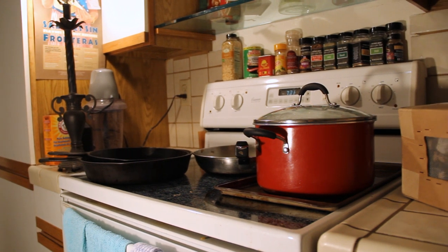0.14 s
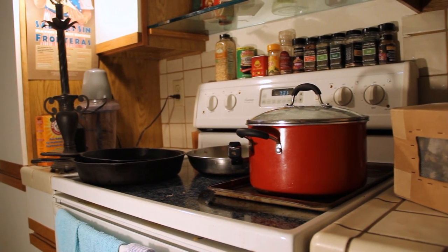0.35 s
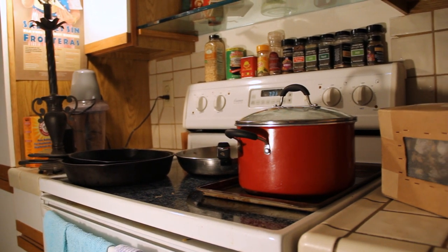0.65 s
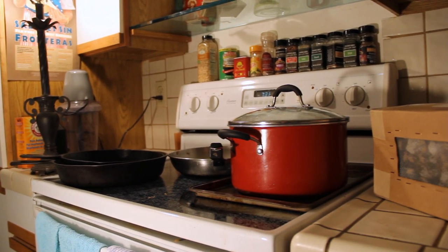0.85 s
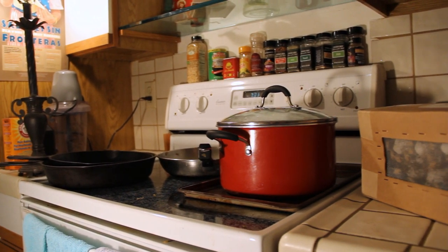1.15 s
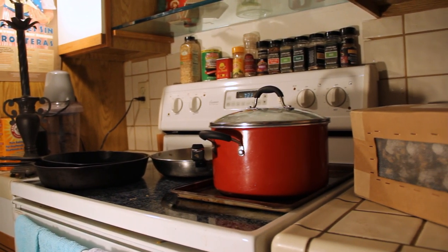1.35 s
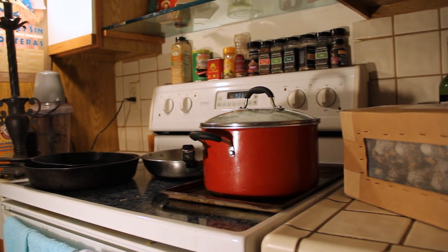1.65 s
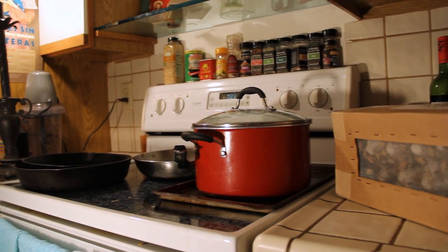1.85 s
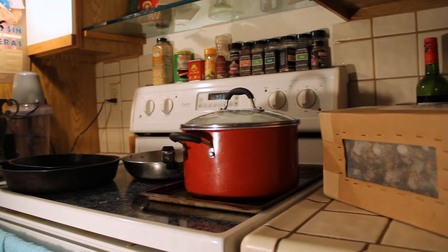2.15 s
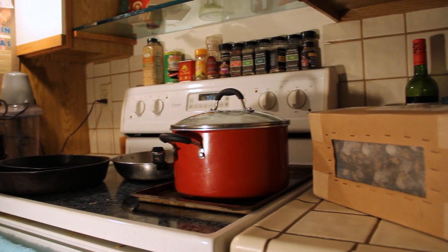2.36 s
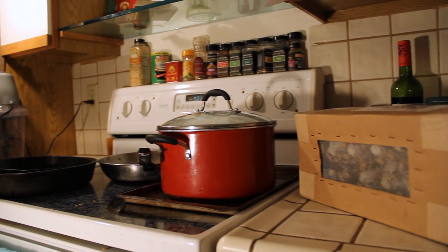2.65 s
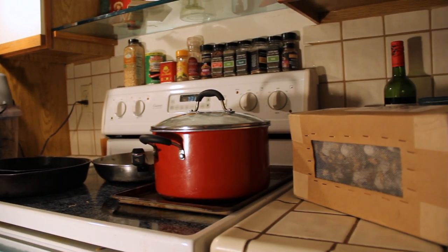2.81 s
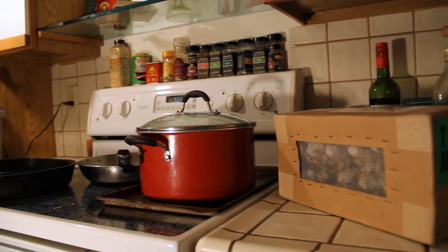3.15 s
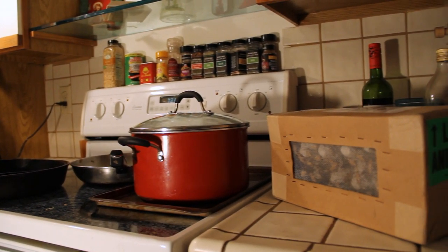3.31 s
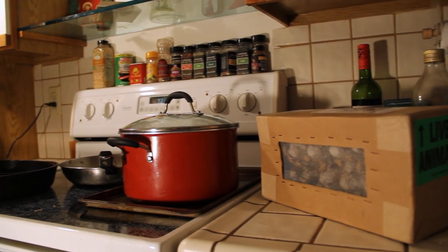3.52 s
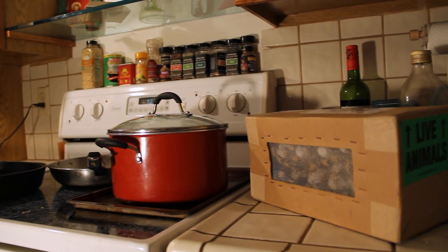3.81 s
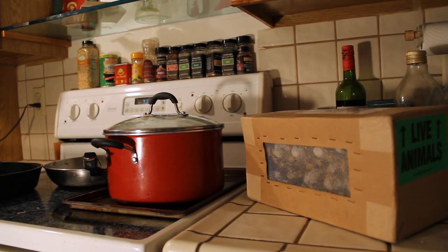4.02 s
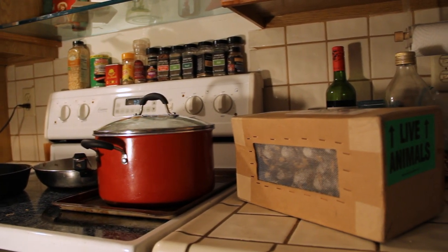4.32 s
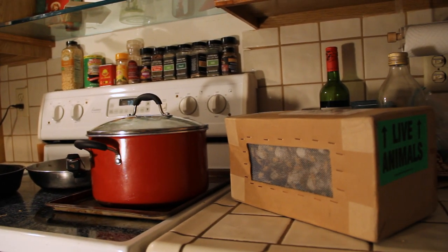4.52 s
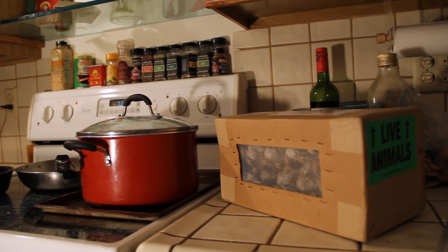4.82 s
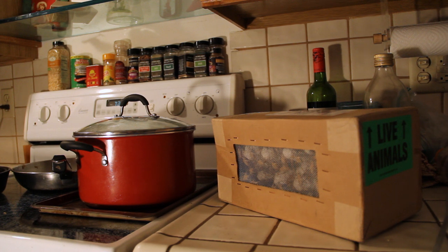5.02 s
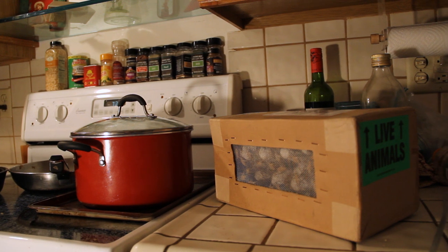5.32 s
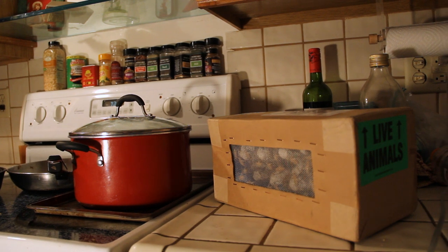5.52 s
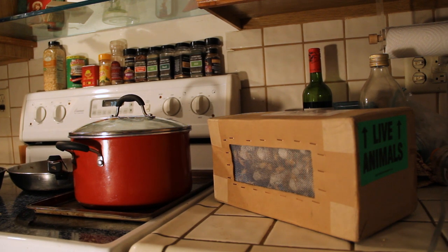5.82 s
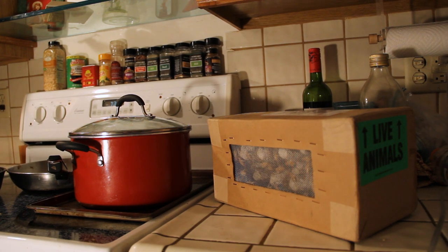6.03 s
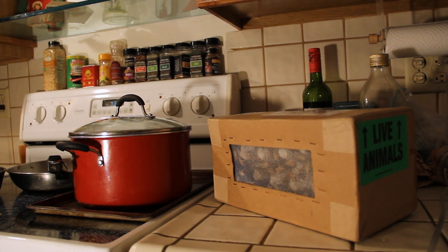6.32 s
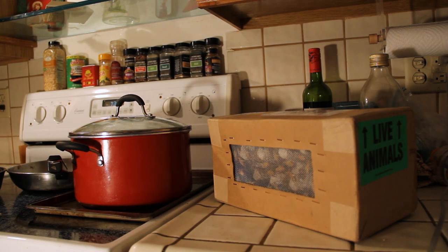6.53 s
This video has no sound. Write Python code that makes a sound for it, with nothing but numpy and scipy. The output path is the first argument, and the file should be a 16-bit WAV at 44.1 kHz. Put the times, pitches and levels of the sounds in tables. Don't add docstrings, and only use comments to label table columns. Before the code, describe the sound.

A cricket in a cardboard box sings fast, steady, high three-stroke chirps close by, while a weaker neighbour rasps behind over a faint refrigerator hum.

```python
import sys
import numpy as np
from scipy import signal
from scipy.fft import rfft, irfft, next_fast_len
from scipy.io import wavfile
from scipy.ndimage import uniform_filter1d

SR = 44100
rng = np.random.default_rng(int(sys.argv[2]) if len(sys.argv) > 2 else 0)


def wav_record(signal):
    frames = np.transpose(np.atleast_2d(signal))
    bounded = np.clip(frames, -1, 1)
    quanta = np.round(bounded * 32767).astype(np.int16)
    wavfile.write(sys.argv[1], SR, quanta)


def boost_factor(decibels):
    exponent = np.asarray(decibels, float) / 20
    return 10 ** exponent


N = 293629

SINGER_PACE = [0.0236, 0.3317, 0.7712, 1.3384, 1.4790, 1.7639, 1.9074, 2.0578, 2.2001, 2.4936, 2.8003,
               3.5534, 3.8459, 3.9900, 4.5860, 5.3312, 5.4745, 5.9102, 6.3507, 6.6380]
# (frequency [Hz], level [dB])
TOOTH_COLOUR = [(4300, -10), (5000, -4), (6200, 3), (7200, 6.5), (7800, -4), (8250, -4), (8750, -6.5),
                (9500, -12), (10400, -4.5), (11300, -8.5), (12500, -10.5), (14000, -7.5), (16000, -13.5)]


def colour(x, points):
    hz, db = np.transpose(points)
    size = next_fast_len(len(x))
    axis = np.log(np.arange(size // 2 + 1) * SR / size + 1)
    gain = boost_factor(np.interp(axis, np.log(hz), db, left=-90))
    return irfft(rfft(x, size) * gain, size)[:len(x)]


def level(x, db):
    return x * boost_factor(db) / np.sqrt(np.mean(x ** 2))


def add(track, x, s):
    i = max(int(s * SR), 0)
    track[i:i + len(x)] += x[:max(N - i, 0)]


def resonance(x, hz, width_hz):
    return signal.lfilter(*signal.iirpeak(hz, hz / width_hz, fs=SR), x)


def tail(t60, start_s):
    t = np.arange(int(.3 * SR)) / SR
    decay = np.exp(-np.log(1000) * t / t60)
    x = rng.standard_normal(len(t)) * decay * np.clip(t / start_s, 0, 1) ** 2
    return x / np.sqrt(np.sum(x ** 2))


def whine(curve):
    s, hz, db = np.transpose(curve)
    t = np.arange(N) / SR
    fade = np.clip(np.minimum(t - s[0] + .01, s[-1] - t) / .03, 0, 1)
    phase = 2 * np.pi * np.cumsum(np.interp(t, s, hz)) / SR
    return np.sqrt(2) * fade * boost_factor(np.interp(t, s, db)) * np.sin(phase)


def rumble_and_hiss():
    # (frequency [Hz], level [dB])
    low_floor = [(20, -0.5), (40, -12), (52, -4), (85, 1), (130, -5.5), (155, -13.5), (300, -12.5),
                 (420, -10.5), (650, -14.5), (1000, -17.5), (1800, -24.5), (4200, -28)]
    # (frequency [Hz], level [dB])
    hiss_colour = [(3000, -34), (4200, 8.5), (8000, 8.5), (16000, 2.5)]
    rumble = level(colour(rng.standard_normal(N), low_floor + [(4600, -91)]), -63.5)
    return rumble + level(colour(rng.standard_normal(N), hiss_colour), -71)


def refrigerator():
    # (frequency [Hz], width [Hz], rms level [dB])
    panels = [(79.6, 2.5, -82), (93, 7.5, -70), (120, 12, -72.5), (243, 16, -75.5), (419, 23, -76.5),
              (557, 7.2, -84.5), (598, 4.8, -82), (753, 4.6, -82.5)]
    # (frequency [Hz], rms level [dB])
    motor = [(59.2, -71.5), (118.4, -69), (236.8, -77), (249.5, -70), (295.5, -77.5), (354.5, -84),
             (472.5, -75.5), (500.6, -80.5), (531, -81.5)]
    out = np.zeros(N)
    for hz, width_hz, db in panels:
        out += level(resonance(rng.standard_normal(N), hz, width_hz), db)
    for hz, db in motor:
        beat_db = uniform_filter1d(rng.standard_normal(N // 4096 + 1).repeat(4096), 4096)[:N]
        tone = np.sin(2 * np.pi * (hz * np.arange(N) / SR + rng.random()))
        out += level(boost_factor(2.4 * beat_db) * tone, db)
    return out


def passing_whines():
    # (time [s], pitch [Hz], rms level [dB])
    thin = [
        (0.0, 570, -72),
        (0.30, 611, -70),
        (0.35, 624, -90),
    ]
    # (time [s], pitch [Hz], rms level [dB])
    engine = [
        (1.2, 117, -84),
        (1.5, 122, -70),
        (2.15, 139, -71),
        (2.5, 148, -88),
        (2.9, 160, -67),
        (3.7, 181.3, -77),
        (4.0, 180, -83),
    ]
    # (time [s], pitch [Hz], rms level [dB])
    moan = [
        (0, 187.4, -67),
        (.15, 189.3, -72),
        (.27, 208, -68),
    ]
    return whine(thin) + whine(engine) + whine(moan)


def clock():
    tick_s, rebound_s = .548, .045
    steps = np.zeros(N)
    steps[int(tick_s * SR)::SR] = 1
    steps[int((tick_s + rebound_s) * SR)::SR] = 0.91
    ring = colour(tail(0.45, 0.0019), [(400, -26), (800, 11.5), (1500, -2.5), (2500, 0.5), (4500, -1), (8000, -33)])
    return boost_factor(-34) * signal.fftconvolve(steps, ring)[:N]


def chirp_times(pace):
    period_s = .147
    number = np.cumsum(np.round(np.diff(pace, prepend=pace[0]) / period_s))
    return np.interp(np.arange(number[-1] + 1), number, pace)


def stroke(t, hz0, hz1, ms, swell, fade, glide):
    u = np.clip(t * 1000 / ms, 0, 1)
    top = swell / (swell + fade)
    envelope = (u / top) ** swell * ((1 - u) / (1 - top)) ** fade
    cycles = ms / 1000 * (hz0 * u + (hz1 - hz0) * u ** (glide + 1) / (glide + 1))
    return envelope, 2 * np.pi * cycles


def rasps():
    # (time [s], force [dB], which has no effect below)
    neighbour_pace = [(0.122, 0), (0.862, -3), (1.008, -1), (1.308, -1), (1.492, -6), (1.616, -3),
                      (1.765, 0), (1.903, -5), (2.313, 2), (2.762, -1), (2.949, 1), (3.084, 1),
                      (3.242, 3.5), (3.399, 0), (3.573, -11), (3.697, 8), (3.844, -6), (3.981, -12),
                      (4.097, 0), (4.23, -2), (4.516, 0), (4.669, 2), (5.096, 0), (5.218, -6), (5.372, -1),
                      (5.660, 1), (5.824, -1), (6.27, -5), (6.567, 2)]
    # (time from last stroke [ms], rasp level [dB], tone level [dB])
    neighbour_strokes = [
        (-37, -74.5, -62),
        (-24, -56.5, -52),
        (1.5, -54.5, -51),
    ]
    # (time from first stroke [ms], rasp level [dB], tone level [dB])
    singer_rasps = [
        (1.53, -61, -48),
        (17.05, -65, -65),
        (38.44, -62.5, -55),
    ]
    # (time [s], rasp level [dB], tone level [dB])
    accents = [(1.428, -62, -53), (0.665, -59, -50), (0.951, -56, -50), (3.822, -65, -48),
               (1.236, -52.5, -50), (1.307, -64, -42), (1.519, -60, -55), (1.765, -66, -34.5),
               (2.312, -58, -38), (2.46, -58, -40.5), (2.762, -72, -40.5), (2.927, -62, -53),
               (3.4, -67, -48), (3.549, -64, -50), (3.955, -66, -32), (4.097, -65, -44),
               (4.230, -68, -41.5), (4.329, -54, -55), (4.376, -65, -41), (1.468, -70, -48),
               (4.775, -53.5, -52), (4.811, -65, -43.5), (4.921, -62, -54), (5.092, -66, -52),
               (5.372, -82, -41), (5.494, -69, -59), (5.514, -56, -50), (5.972, -63, -52),
               (6.103, -56.5, -41), (6.243, -72, -32.5)]
    pace, force_db = np.transpose(neighbour_pace)
    rows = []
    for s in chirp_times(pace):
        for ms, rasp_db, tone_db in neighbour_strokes:
            force = (ms == 0) * np.interp(s, pace, force_db)
            rows.append((s + ms / 1000, rasp_db + force, tone_db))
    for s in chirp_times(SINGER_PACE):
        for ms, rasp_db, tone_db in singer_rasps:
            rows.append((s + ms / 1000, rasp_db, tone_db))
    scatter = rng.standard_normal((len(rows), 3)) * [0, 1.5, 3]
    return np.vstack([rows + scatter, accents])


def neighbour():
    # (frequency [Hz], level [dB])
    trays = [(4000, -4), (5000, 0.5), (5600, -1), (6500, -2.5), (7600, -2), (8600, 0), (10000, -0.5),
             (16000, 0.5)]
    # (frequency [Hz], width [Hz], level [dB])
    hollows = [(5300, 240, -5), (7930, 130, 2), (8690, 270, -0.5), (9630, 140, 0), (11360, 400, -1)]
    tone_hz, rasp_gain_db, tone_gain_db = 5600, 4, -3
    rasp, tone = np.zeros(N), np.zeros(N)
    t = np.arange(1 << 11) / SR
    burst = np.clip(t / .002, 0, 1) * np.exp(-(t / 0.0094) ** 1.73)
    rows = rasps()
    for (s, noise_db, ring_db), d in zip(rows, rng.standard_normal((len(rows), 2))):
        hz0, hz1 = tone_hz + 60 + 40 * d[0], tone_hz - 90 + 40 * d[1]
        envelope, phase = stroke(t, hz0, hz1, 11.1, 3.2, 1.0, 2.0)
        ring = np.sin(phase) + boost_factor(-31.0) * np.sin(2 * phase)
        add(tone, boost_factor(ring_db + tone_gain_db) * envelope * ring, s)
        add(rasp, boost_factor(noise_db + rasp_gain_db) * burst, s + 0.0006)
    force = boost_factor(4 * np.minimum(rng.exponential(size=N // 48 + 1), 2)).repeat(48)[:N]
    clicks = rng.standard_normal(N) * force
    rasp = rasp * level(colour(colour(clicks, TOOTH_COLOUR), trays), 0)
    rings = sum(boost_factor(db) * resonance(rasp, hz, width_hz) for hz, width_hz, db in hollows)
    dry = tone + boost_factor(-4) * rasp + boost_factor(1.5) * rings
    return dry + boost_factor(-6) * signal.fftconvolve(dry, tail(0.068, 0.0039))[:N]


def singer():
    # (start [Hz], end [Hz], length [ms], swell [power], fade [power], glide [power], peak [dB])
    strokes = [
        (6306, 5700, 6.16, 0.51, 1.9, 0.74, -39),
        (6960, 5848, 11.18, 3, 0.88, 1.396, -29.0),
        (6853, 5834, 12.51, 1.12, 0.56, 1.083, -29.0),
    ]
    # (level under the stroke [dB], fall [dB/ms])
    octaves = [
        (-16.5, 5.5),
        (-7, 3),
        (-16, 1.5),
    ]
    # (lead [ms], start [Hz], end [Hz], length [ms], peak [dB])
    cocking = (14, 5500, 4989, 18.5, -58)
    # (delay [ms], level [dB])
    echoes = [(0.0, -16.7), (1.759, 0.0), (3.252, -9.0), (4.855, -3.5), (5.938, -15.5), (7.37, -12.6),
              (8.503, -21.8), (10.328, -12.6), (12.66, -13.1), (13.977, -9.9), (15.874, -21.9),
              (19.432, -23.0)]
    # (frequency [Hz], level [dB])
    octave_colour = [(10500, -23), (11600, 6.5), (12200, -10), (12850, 3.5), (13300, -11), (13800, -32),
                     (15000, -30)]
    # (frequency [Hz], level [dB])
    bounce_colour = [(10500, -21), (11500, 5), (12200, 6), (12800, -0.5), (13500, -22), (15000, -30)]
    # (frequency [Hz], level [dB])
    box_front = [(3500, -18), (5000, -13), (5500, 0), (16000, -0.5)]
    octave_echo = 1.92
    spread_hz, spread_db, gap_spread_ms = 14, 0.33, .3
    stroke_ms = np.array([0.7, 15.5, 15.5 + 22.9])
    near, high, bounced, dry, teeth, cocked = np.zeros((6, N))
    t = np.arange(1 << 11) / SR
    delay_ms, path_db = np.array(echoes).T[:, :, None]
    late = t - delay_ms / 1000
    times = chirp_times(SINGER_PACE)
    for s, draws in zip(times, rng.standard_normal((len(times), 3, 4))):
        starts = s + (stroke_ms + gap_spread_ms * draws[:, 3]) / 1000
        for start, (hz0, hz1, *shape, db), (octave_db, fall_db), d in zip(starts, strokes, octaves, draws):
            gain = boost_factor(db + spread_db * d[2])
            envelope, phase = stroke(late, hz0 + spread_hz * d[0], hz1 + spread_hz * d[1], *shape)
            phase = phase + 9 * d[3]
            octave = boost_factor(octave_db + octave_echo * path_db - fall_db * (late * 1000 - shape[0] / 2))
            add(near, gain * np.sum(envelope * boost_factor(path_db) * np.sin(phase), axis=0), start)
            paths = gain * envelope * octave * np.sin(2 * phase)
            add(high, paths[:4].sum(axis=0), start)
            add(bounced, paths[4:].sum(axis=0), start)
            add(dry, gain * envelope[1] * np.sin(phase[1]), start)
            add(teeth, gain ** 0.85 * np.exp(-t / 0.016), start + 0.0029)
        early_ms, hz0, hz1, ms, db = cocking
        envelope, phase = stroke(t, hz0 + 90 * draws[0, 0], hz1, ms, 0.26, 1.16, 0.65)
        wobble = .2 * rng.standard_normal(len(t)).cumsum()
        add(teeth, boost_factor(db + 16.0) * envelope, s - early_ms / 1000)
        add(cocked, boost_factor(db + 1.3 * draws[0, 2]) * envelope * np.sin(phase + wobble), s - early_ms / 1000)
    bounced = colour(high * boost_factor(-28) + bounced, bounce_colour)
    high = colour(high, octave_colour)
    scratch = boost_factor(-33) * teeth * level(colour(rng.standard_normal(N), TOOTH_COLOUR), 0)
    room = signal.fftconvolve(dry + boost_factor(1) * bounced + scratch, tail(0.21, .02))[:N]
    room = colour(room, [(3000, -9), (5600, 5.5), (6000, -7), (6350, 0.5), (6700, 2.5), (7500, -19), (16000, 13)])
    return colour(near, box_front) + cocked + high + bounced + scratch + boost_factor(-12.5) * room


def scene():
    kitchen = rumble_and_hiss() + refrigerator() + passing_whines() + clock()
    return (kitchen + neighbour() + singer())[None]


def top_cut(x):
    return signal.sosfilt(signal.butter(12, 16450, fs=SR, output="sos"), x)


def record(dry):
    top = signal.ellip(10, .2, 70, 16000, fs=SR, output="sos")
    mix = signal.sosfilt(top, dry)
    return top_cut(mix)


dry = scene()
out = record(dry)
wav_record(out)
```